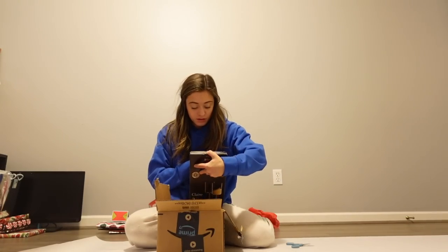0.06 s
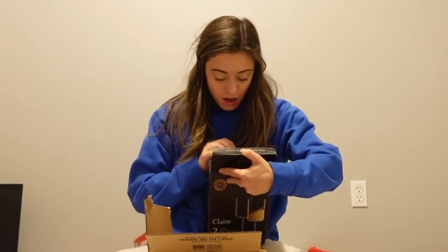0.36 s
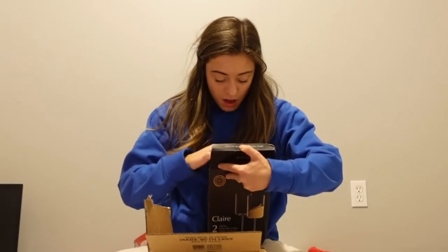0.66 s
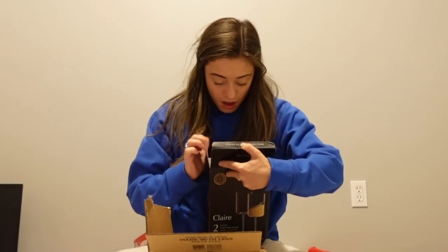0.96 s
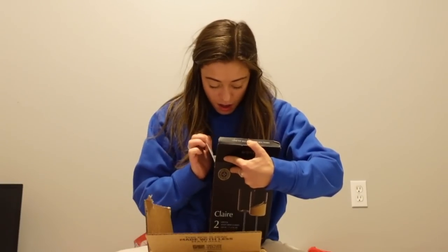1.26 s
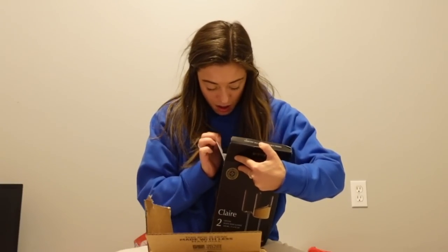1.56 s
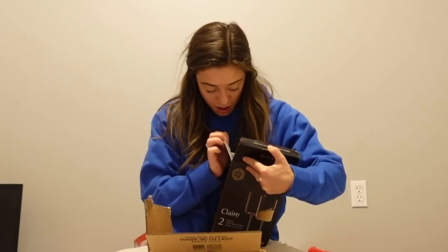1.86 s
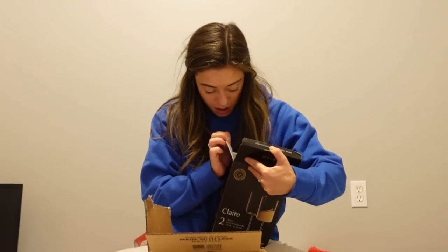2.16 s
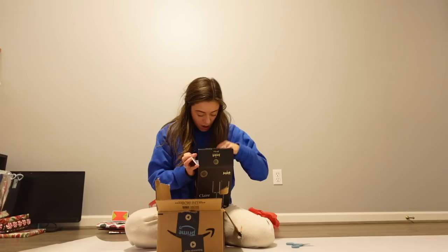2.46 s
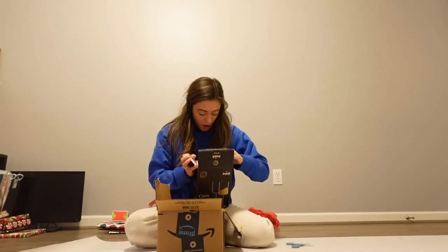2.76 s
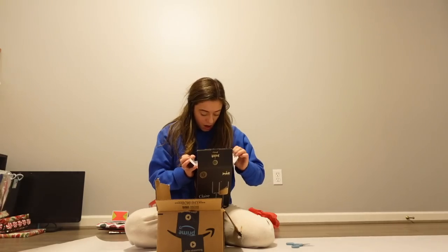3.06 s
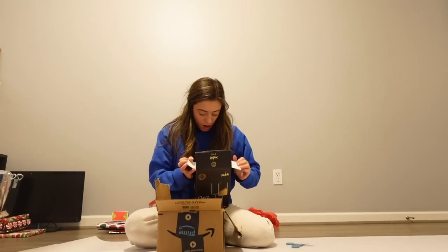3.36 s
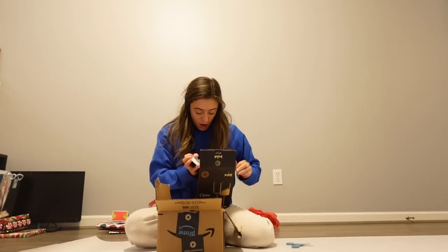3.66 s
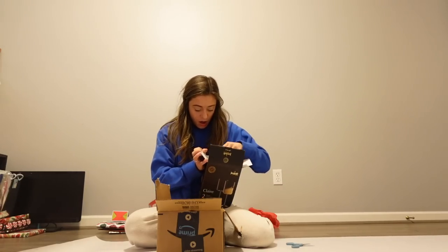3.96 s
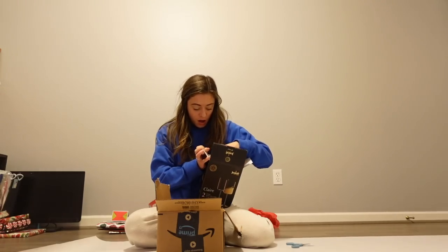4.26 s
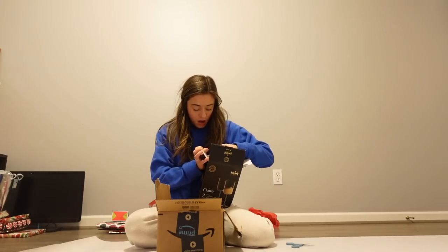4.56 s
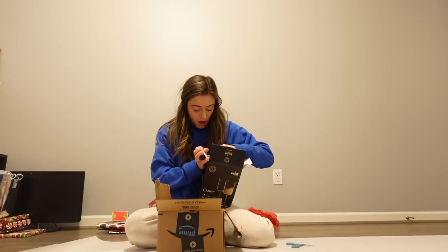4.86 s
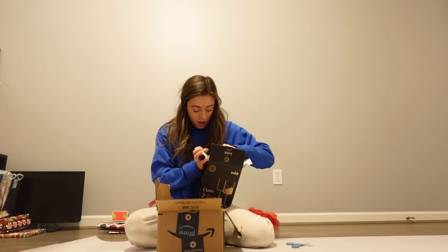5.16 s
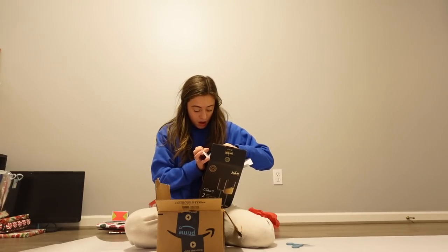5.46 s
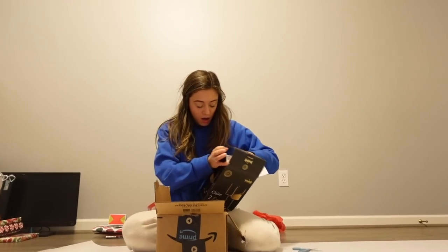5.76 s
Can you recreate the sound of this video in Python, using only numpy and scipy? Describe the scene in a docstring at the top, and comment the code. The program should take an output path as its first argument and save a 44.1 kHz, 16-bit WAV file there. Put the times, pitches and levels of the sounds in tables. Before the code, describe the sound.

Hands rub and knock a cardboard box, its flaps pop and rip open, and broken pieces clink and scrape inside, in an echoing room.

```python
"""A cardboard box with broken pieces inside is worked open and tilted in a bare, echoing room.
Over soft room air, hands and packing rub on the card and the box gives hollow knocks. A flap pops
loose in the first second. Near 3 s another rips free, the card squeaks and the jolted pieces clink.
More rubs and knocks follow; just after 5 s the pieces scrape shrilly against each other,
and the level dips briefly before the last strokes and knocks."""
import sys
import numpy as np
from scipy import signal
from scipy.fft import rfft, irfft, next_fast_len
from scipy.io import wavfile

SR = 44100
rng = np.random.default_rng(int(sys.argv[2]) if len(sys.argv) > 2 else 0)


def wav_out(sig):
    """Save sig, one row per channel (or a flat mono array), as 16-bit PCM at SR to the path in sys.argv[1]."""
    wavfile.write(sys.argv[1], SR, np.round(np.clip(np.atleast_2d(sig).T, -1, 1) * 32767).astype(np.int16))


N = 264908
T = np.arange(N) / SR


def amp(db):
    """Decibels to gain."""
    return 10 ** (np.asarray(db) / 20)


def unit_rms(x):
    """Scales to rms 1."""
    return x / np.sqrt(np.mean(x ** 2) + 1e-20)


def curve_at(points, hz):
    """Reads a curve of (Hz, value) points along a log-frequency axis."""
    point_hz, value = np.transpose(points)
    return np.interp(np.log(hz + 1), np.log(point_hz), value)


def add(mix, s, sound):
    """Mixes a sound in at s seconds, or at 0 if s is negative."""
    part = mix[max(round(s * SR), 0):][:len(sound)]
    part += sound[:len(part)]


def highpass(x, hz, order=3):
    """Rolls off the bass, which small things barely radiate."""
    return signal.sosfilt(signal.butter(order, hz, "high", fs=SR, output="sos"), x)


def swell(t, length, rise_s, fall_s):
    """A smooth rise, a hold and a smooth fall, within the given length."""
    rise = np.sin(np.pi / 2 * np.clip(t / rise_s, 0, 1))
    fall = np.sin(np.pi / 2 * np.clip((length - t) / fall_s, 0, 1))
    return rise * fall


def pulse(colour, tilt_db=0, dispersion=0, size=4096):
    """A click of energy 1, tilted per octave; with dispersion the treble leads, as in bending card."""
    hz = abs(np.fft.fftfreq(size, 1 / SR))
    log_gain = np.log(amp(curve_at(colour, hz) + tilt_db * np.log2(np.clip(hz, 300, 12000))))
    log_spectrum = np.conj(signal.hilbert(log_gain))  # minimum phase keeps the attack sharp
    spectrum = np.exp(log_spectrum - 1j * dispersion * np.sqrt(hz))
    click = irfft(spectrum[:size // 2 + 1])
    return click / np.linalg.norm(click)


def hit_gain(db):
    """Gain that gives a click of energy 1 this level over a millisecond."""
    return amp(db) * np.sqrt(SR / 1000)


def coloured(x, colour):
    """Puts x through an EQ curve, at rms 1."""
    return unit_rms(signal.oaconvolve(x, pulse(colour))[:N])


def resonate(x, hz, width_hz):
    """A steep-sided resonance that can follow a moving pitch, at rms 1."""
    carrier = np.exp(2j * np.pi * np.cumsum(hz * np.ones(len(x))) / SR)
    pole = np.exp(-np.pi * width_hz / SR)
    baseband = signal.lfilter([1], [1, -2 * pole, pole * pole], x / carrier)
    return unit_rms((carrier * baseband).real)


def slips(per_s, spread_db):
    """Friction as a random train of tiny slips of uneven size."""
    size = amp(spread_db * np.minimum(rng.exponential(1, N), 4))
    return unit_rms(size * rng.choice([-1, 1], N) * (rng.random(N) < per_s / SR))


def room_air(hiss_db=-68, drone_db=-76.5):
    """A steady bed of room hiss with a soft ventilation drone."""
    # Tone of the still room. Each row: frequency in Hz, relative level in dB.
    hiss_colour = [(30, -68), (80, -38.5), (197, -30.5), (292, -30), (350, -20), (420, -23.5), (546, -21.5),
                   (639, -10.5), (852, -19.5), (1170, -13), (1470, -20), (2490, -20), (2760, -21),
                   (2990, -25), (15500, -33.5)]
    hiss, draught = rng.standard_normal((2, N))
    drone = resonate(draught, hz=664.7, width_hz=65)
    return amp(hiss_db) * coloured(hiss, hiss_colour) + amp(drone_db) * drone


def rubs(catch_db=-10):
    """Hands and packing drag over the card in fine slips with a few coarse catches."""
    # Each row is a stroke: start in seconds, length in seconds, level in dB, tilt in dB per octave.
    strokes = [(-.04, 0.28, -68.5, -6), (0.333, .16, -61.5, -4), (0.573, 0.16, -56.5, -1),
               (.69, 0.071, -45, -1.5), (1.025, 0.54, -70.5, -5), (1.647, 0.12, -65.5, -4.5),
               (2.355, 0.41, -71.5, -3.5), (3.501, 0.15, -54.5, -1.5), (3.668, 0.13, -52.5, -3.5),
               (3.746, 0.091, -49.5, 0.5), (4.013, 0.19, -56, -1), (4.188, .11, -54.5, 2),
               (4.3, 0.18, -61.5, -2.5), (4.451, 0.39, -56.5, 1.5), (4.77, 0.19, -56, -.5),
               (4.944, 0.23, -55.5, .5), (5.119, 0.19, -51, 0.5), (5.426, 0.22, -56.5, -0.5),
               (5.612, 0.2, -58.5, 0), (5.769, 0.17, -49, -0.2), (5.92, 0.16, -53.5, -2)]
    # Tone of rubbed card. Each row: frequency in Hz, relative level in dB.
    rub_colour = [(100, -47), (300, -12), (520, -9.5), (730, -1.5), (900, -4), (1350, 1.5), (2200, 0),
                  (3500, 0), (5500, 0.5), (8000, -5.5), (11000, -11), (15500, -18.5)]
    out = np.zeros(N)
    friction = slips(per_s=3000, spread_db=4) + amp(catch_db) * slips(per_s=28, spread_db=0.59)
    for s, length, db, tilt_db in strokes:
        start, t = round(s * SR), T[:round(length * SR)]
        drive = np.roll(friction, -start)[:len(t)] * swell(t, length, rise_s=0.05, fall_s=0.079)
        stroke = signal.fftconvolve(drive, pulse(rub_colour, tilt_db))
        add(out, s, amp(db) * stroke[max(-start, 0):])  # the first stroke is already under way
    return out


def knocks(hard_rap_db=-30.5, gain_db=0.5):
    """Each knock raps the walls and pumps the air inside the box, whose pitch changes with the grip."""
    # Each row: start in seconds, boom strength in dB, boom pitch in Hz, rap strength in dB.
    hits = [(.002, -49.5, 272, -48), (.636, -52, 354, -39), (.757, -36, 346, -55), (2.567, -42.5, 303, -70),
            (2.771, -46.5, 325, -63), (2.982, -34.5, 357, -37), (3.002, -41, 354, -39.5),
            (3.572, -56, 298, -46), (3.723, -52.5, 276, -41.5), (4.02, -49, 350, -60),
            (4.075, -55, 310, -46.5), (4.528, -43.5, 277, -23.5), (4.534, -60, 280, -35.5),
            (4.544, -74.5, 280, -34.5), (4.557, -47, 278, -44), (4.586, -45, 267, -28.5),
            (4.646, -61, 267, -35.5), (4.797, -50, 325, -62), (4.82, -43.5, 327, -55),
            (5.816, -45, 324, -54), (5.953, -46.5, 298, -36)]
    # Boom of the enclosed air, retuned for each hit. Each row: frequency in Hz, relative level in dB.
    boom_colour = [(60, -41), (130, -40), (195, -30.5), (250, -3.5), (330, 5.5), (430, -3.5), (700, -8.5),
                   (2000, -25.5), (8000, -54)]
    # Tone of the walls. Each row: frequency in Hz, relative level in dB.
    wall_colour = [(130, -28), (210, -21), (450, -10.5), (580, -10.5), (745, 7), (900, -8), (1150, -1),
                   (1400, -14), (2020, -1), (2600, -19), (3550, -6.5), (4500, -15.5), (9000, -25),
                   (15000, -42)]
    out = np.zeros(N)
    peak_hz = max(boom_colour, key=lambda point: point[1])[0]
    for s, boom_db, boom_hz, rap_db in hits:
        boom = pulse([(hz * boom_hz / peak_hz, db) for hz, db in boom_colour])
        tilt_db = 0.6 * (rap_db - hard_rap_db) / 10  # softer raps are duller
        rap = pulse(wall_colour, tilt_db, dispersion=1.1)
        add(out, s, hit_gain(boom_db) * boom + hit_gain(rap_db) * rap)
    return amp(gain_db) * out


def whines():
    """Faint, thin pure tones swell and fade."""
    # Each row: start in seconds, length in seconds, pitch in Hz, level in dB.
    tones = [(0.185, 0.38, 7730, -76), (2.14, 0.35, 2850, -78.5)]
    out = np.zeros(N)
    for s, length, hz, db in tones:
        t = T[:round(length * SR)]
        tone = np.sqrt(2) * np.sin(2 * np.pi * hz * t)
        add(out, s, amp(db) * tone * signal.windows.tukey(len(t), 0.5))
    return out


def snaps(gain_db=2):
    """The card cracks: returns the send to the room and the brighter part aimed at the microphone."""
    # Each row: start in seconds, strength in dB, tilt in dB per octave, aimed part's offset in dB.
    cracks = [(0.6356, -38.5, -6.5, 1), (0.7275, -35.5, 3.5, -2), (0.7532, -43, -2, 13),
              (0.755, -16.5, -1.1, 2.5), (0.766, -36.5, 1, -2), (0.8176, -28.5, -3, -5),
              (1.146, -48.5, 14, -2), (1.693, -58.5, 6, -1), (2.5673, -44, 2, -7), (2.9039, -19.5, 4, -8),
              (2.975, -25.5, 10, 0), (2.9874, -22.5, 0.5, 5.5), (4.128, -50, 15, 8), (4.2478, -58, 11, 11),
              (4.335, -45, 9, -3), (4.8739, -42.5, -2, 2), (4.9359, -39.5, 4, 2), (5.214, -33.5, 4, -0.5),
              (5.2582, -31, 5, -6), (5.6144, -34.5, 6, 0), (5.627, -50, 20, 2)]
    # Tone of snapping card. Each row: frequency in Hz, relative level in dB.
    snap_colour = [(150, -45), (320, -23), (430, -12.5), (650, -9.5), (850, -13.5), (1180, -1),
                   (1450, -6.5), (2050, 2.5), (2800, -5.5), (3550, -2), (5050, -9.5), (5800, -9.5),
                   (7600, -18), (15000, -35)]
    send, aimed = np.zeros((2, N))
    for s, db, tilt_db, aimed_db in cracks:
        crack = hit_gain(db + gain_db) * pulse(snap_colour, tilt_db, dispersion=0.5006)
        add(send, s, crack)
        add(aimed, s, crack * amp(aimed_db))
    return send, highpass(aimed, hz=1400)


def rip(growth_db_per_octave=25):
    """Fibres part in quick succession and shake the flap, which rings lower and louder as it lengthens."""
    # Each row is a tug: start in seconds, length in seconds, fibre level in dB,
    # flap level at its starting pitch in dB, starting pitch in Hz, ending pitch in Hz.
    tugs = [(2.761, 0.18, -34.5, -43.5, 1890, 1270), (2.976, 0.03, -35, -40.5, 1660, 1560)]
    # Tone of tearing fibres. Each row: frequency in Hz, relative level in dB.
    tear_colour = [(130, -51), (300, -18), (580, -19), (740, -7.5), (1000, -5.5), (1900, 2), (2600, 5),
                   (3600, 2.5), (4600, 1), (6500, -1), (7800, 1), (10000, -5), (15500, -13)]
    out = np.zeros(N)
    for s, length, fibres_db, flap_db, start_hz, end_hz in tugs:
        torn = np.clip((T - s) / length, 0, 1) ** 2.7  # the tear speeds up, so the pitch falls late
        flap_hz = start_hz + (end_hz - start_hz) * torn
        ring_db = flap_db + growth_db_per_octave * np.log2(start_hz / flap_hz)
        fibres = slips(per_s=2300, spread_db=4)
        tear = amp(fibres_db) * coloured(fibres, tear_colour)
        flap = amp(ring_db) * highpass(resonate(fibres, flap_hz, width_hz=700), hz=520)
        out += swell(T - s, length, rise_s=0.023, fall_s=0.0065) * (tear + flap)
    return out


def squeaks():
    """Card sticks and slips on card in brief gliding tones."""
    # Each row: start and length in seconds, starting pitch, ending pitch and width in Hz, level in dB.
    glides = [(2.786, 0.029, 3540, 3690, 200, -32.5), (2.913, 0.047, 1420, 1437, 60, -33.5),
              (2.947, 0.039, 4460, 4820, 130, -42.5), (3.472, 0.18, 3240, 4600, 705, -58),
              (4.104, 0.11, 1493, 1424, 72, -60)]
    out = np.zeros(N)
    for s, length, start_hz, end_hz, width_hz, db in glides:
        n = round(length * SR)
        tone = resonate(rng.standard_normal(SR)[:n], np.linspace(start_hz, end_hz, n), width_hz)
        add(out, s, amp(db) * signal.windows.tukey(n, 0.5) * tone)
    return out


def clinks(damping=3):
    """Broken pieces ring when jolted together, choked by their packing."""
    # Each row is a jolt: start in seconds, strength in dB.
    jolts = [(2.923, -30), (2.934, -43), (2.975, -20.5), (2.988, -29.5), (3.001, -39)]
    # Ring of the pieces. Each row: pitch in Hz, relative level in dB, t60 in seconds before damping.
    modes = [(1474, 3, 0.15), (1656, 7, 0.44), (1770, -19, 0.84), (2250, -10, 0.45), (2620, 7, 0.12),
             (2980, 9, 0.073), (3540, -12, 0.37), (4990, 3, 0.1), (5190, 15.5, 0.052), (5850, 7, 0.12),
             (5960, -16, 0.33), (6300, -19, 0.39)]
    out, t = np.zeros(N), T[:SR // 2]
    for s, strength_db in jolts:
        ring = sum(rng.choice([-1, 1]) * amp(db - 60 * damping * t / t60) * np.cos(2 * np.pi * hz * t)
                   for hz, db, t60 in modes)
        add(out, s, hit_gain(strength_db) * ring / np.linalg.norm(ring))
    return highpass(out, hz=700)


def scrapes(sharpness=1.2, muffling_hz=9000, attack_s=0.00064, fade_db_per_s=900):
    """Shard bites on shard: the chattering edge drives a shrill, fast-dying ring, muffled by the box."""
    # Each row is a slide: start in seconds, level in dB.
    slides = [(5.203, -33), (5.213, -30), (5.248, -41), (5.257, -30), (5.305, -61)]
    # Ring of the shards. Each row: pitch in Hz, width in Hz before sharpening, level in dB before muffling.
    modes = [(3200, 700, -11), (5100, 200, -6), (5300, 170, 0), (5590, 110, -1), (6020, 70, -5),
             (6190, 70, -10), (7450, 140, -12), (8020, 140, -14), (11510, 170, -7), (13200, 90, -21),
             (14350, 200, -15), (15250, 200, -21)]
    out, t = np.zeros(N), T[:SR // 4]
    for s, db in slides:
        chatter = slips(per_s=1200, spread_db=1.5)[:SR // 2]
        ring = np.zeros(len(chatter))
        for hz, width_hz, mode_db in modes:
            muffling = np.hypot(1, (hz / muffling_hz) ** 2)
            ring += amp(mode_db) * resonate(chatter, hz, width_hz / sharpness) / muffling
        envelope = np.minimum(t / attack_s, 1) * amp(db - fade_db_per_s * t)
        add(out, s, envelope * unit_rms(highpass(ring, hz=1200))[-len(t):])
    return out


def reverb(x, build_s=0.002):
    """Dense echoes off bare walls build up quickly, and each band dies at its own speed."""
    # Decay of the room. Each row: frequency in Hz, t60 in seconds.
    decay_times = [(150, 0.31), (300, 0.46), (720, 0.64), (1150, 0.66), (1900, 0.63), (4500, 0.55),
                   (8000, 0.47), (15000, 0.39)]
    hz, t, noise = signal.stft(rng.standard_normal(SR), SR, nperseg=256)
    t60 = curve_at(decay_times, hz)[:, None]
    bands = noise * amp(-60 * t / t60) / np.sqrt(t60)  # about equal energy in every band
    tail = signal.istft(bands, SR, nperseg=256)[1][:SR]
    tail *= 1 - np.exp(-(T[:SR] / build_s) ** 2)
    return signal.fftconvolve(x, tail / np.linalg.norm(tail))[:N]


def widened(mid, other, width):
    """Left and right from a mid signal and an unrelated one that fills the sides."""
    size = next_fast_len(N, True)
    side_gain = amp(curve_at(width, np.fft.rfftfreq(size, 1 / SR)))
    side = irfft(rfft(other, size) * side_gain, size)[:N]
    return np.array([mid + side, mid - side])


def scene(direct_db=-6, reverb_db=-1, air_pan_db=0.5):
    """The box sits dead centre; only echoes and room air give width."""
    # Stereo width of the handling echoes, the echoes from the top of the box and the room air.
    # Each row: frequency in Hz, side level against mid in dB.
    handling_width = [(100, -23), (380, -18.5), (700, -12), (1300, -12), (2400, -15), (4500, -29),
                      (8000, -23.5), (15000, -66)]
    top_width = [(100, -22), (380, -19.5), (700, -7), (1300, -13.5), (2800, -18), (4300, -21.5),
                 (5600, -11), (8000, -12.5), (11500, -14), (15000, -37)]
    air_width = [(60, 2), (200, -9), (700, -0.5), (1300, -1.5), (2400, -4), (8000, -7.5), (15000, -38)]
    snap_send, snap_aimed = snaps()
    handling = knocks() + rubs()
    top = rip() + squeaks() + clinks() + scrapes()
    sends = [(handling + snap_send, handling_width), (top, top_width)]
    echoes = sum(widened(reverb(send), reverb(send), width) for send, width in sends)
    bed = widened(room_air(), room_air(), air_width) * amp([[air_pan_db], [-air_pan_db]])
    return amp(direct_db) * (handling + top + snap_aimed) + amp(reverb_db) * echoes + bed + whines()


def record(dry, low_cut_hz=65, dip_at_s=5.447, dip_width_s=0.005, dip_db=-20, high_cut_hz=16000):
    """The microphone's low cut, a brief dip in level, then a steep high cut."""
    thinned = highpass(dry, low_cut_hz, order=2)
    dipped = thinned * amp(dip_db * np.exp(-abs(T - dip_at_s) / dip_width_s))
    high_cut = signal.firwin(511, high_cut_hz, window=("kaiser", 9), fs=SR)
    return signal.oaconvolve(dipped, high_cut[None], "same", axes=1)


dry = scene()
out = record(dry)
wav_out(out)
```